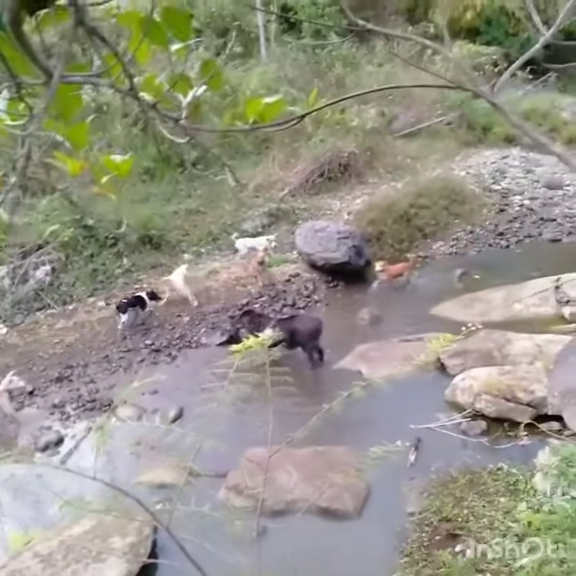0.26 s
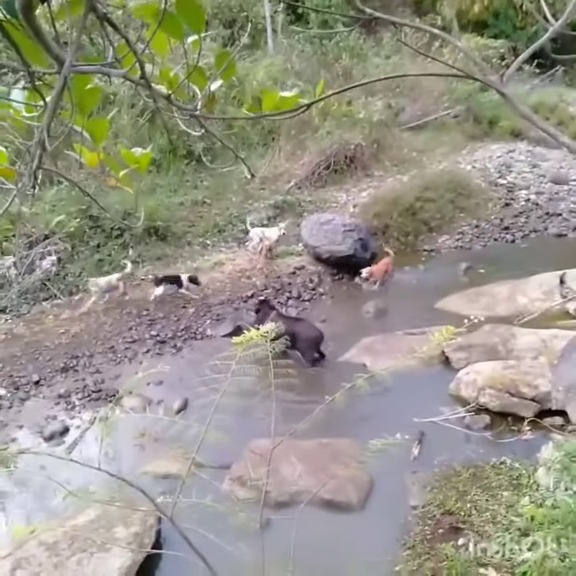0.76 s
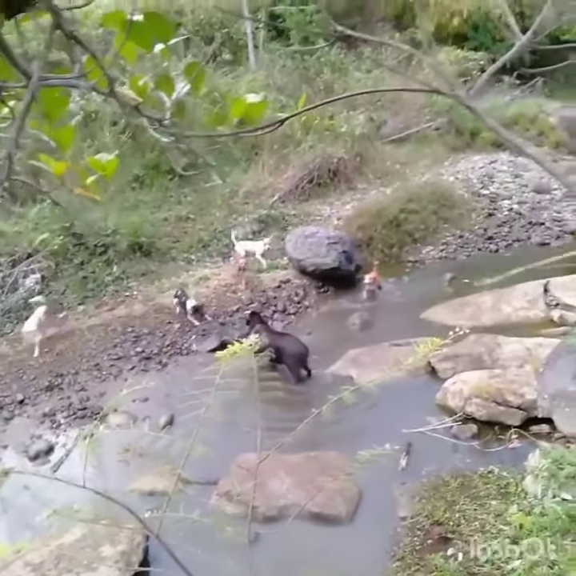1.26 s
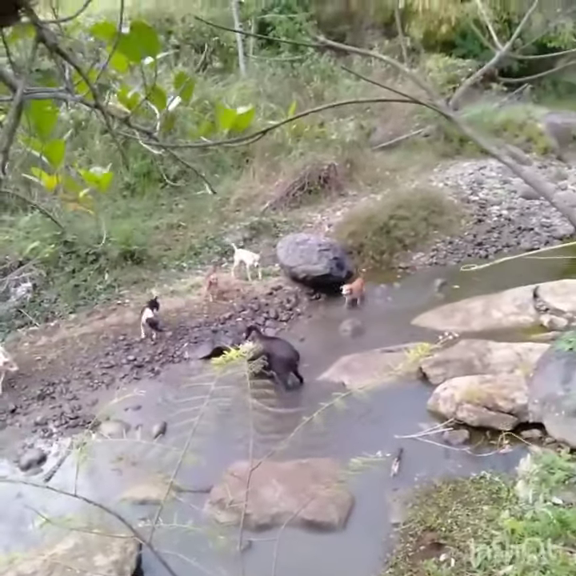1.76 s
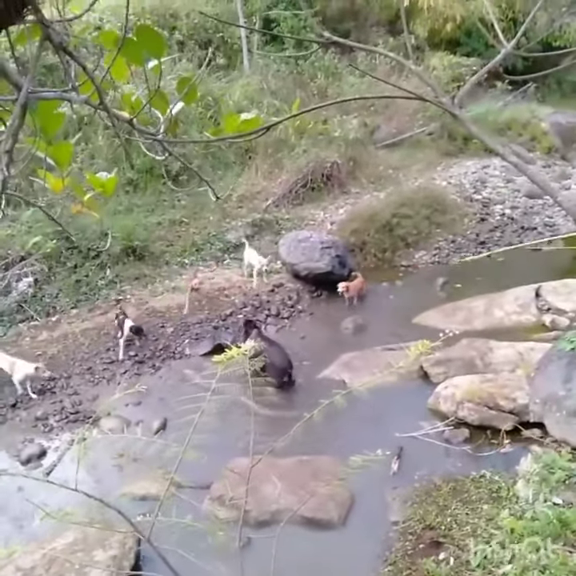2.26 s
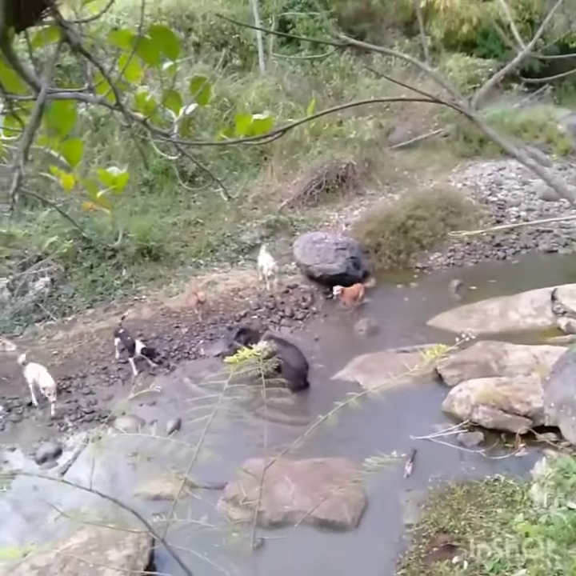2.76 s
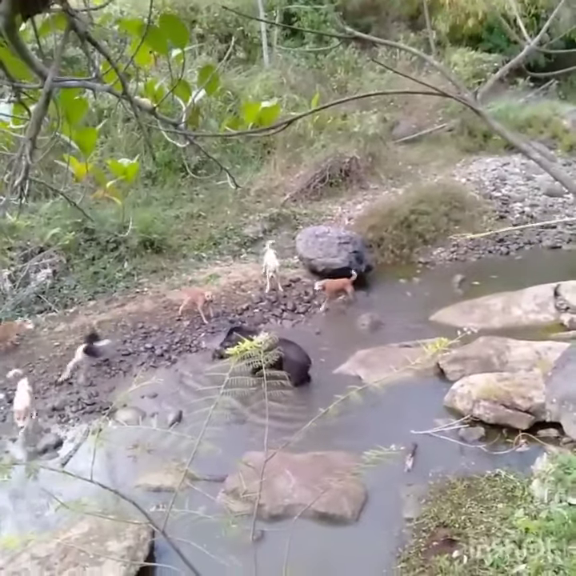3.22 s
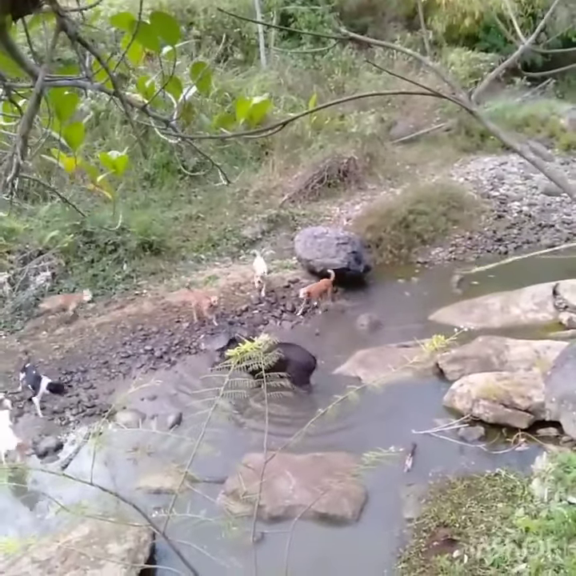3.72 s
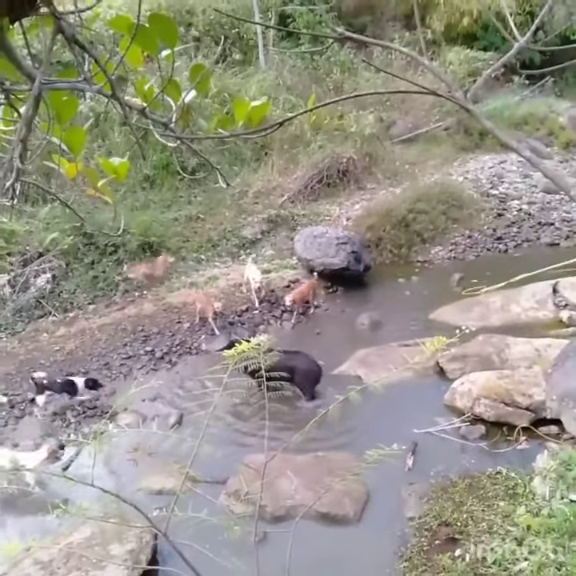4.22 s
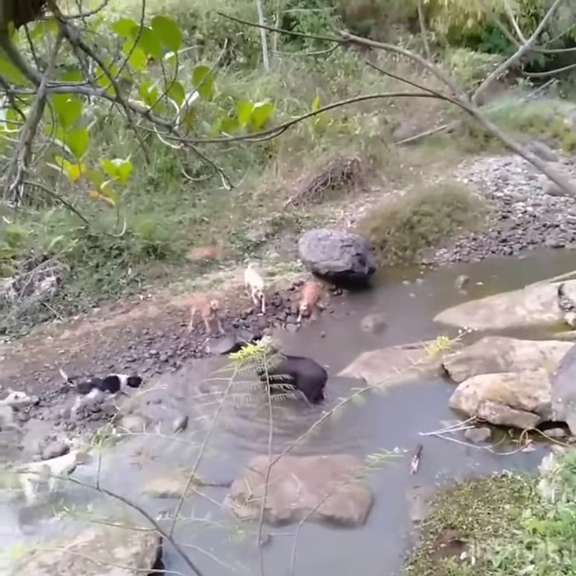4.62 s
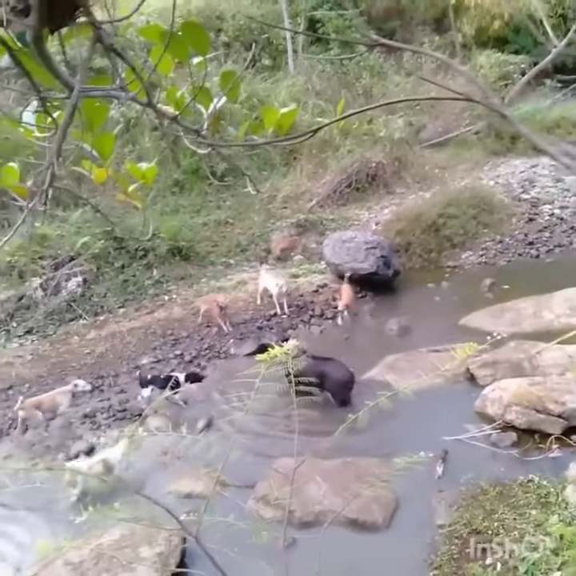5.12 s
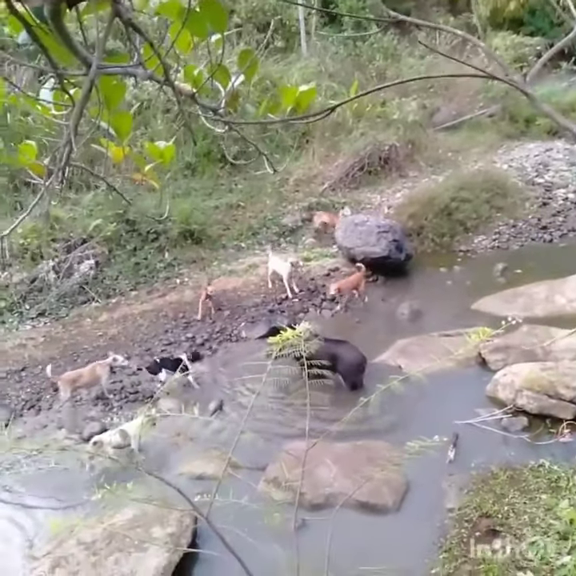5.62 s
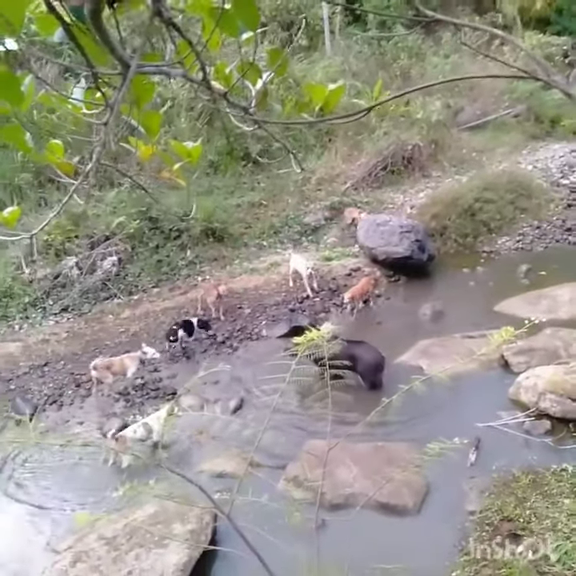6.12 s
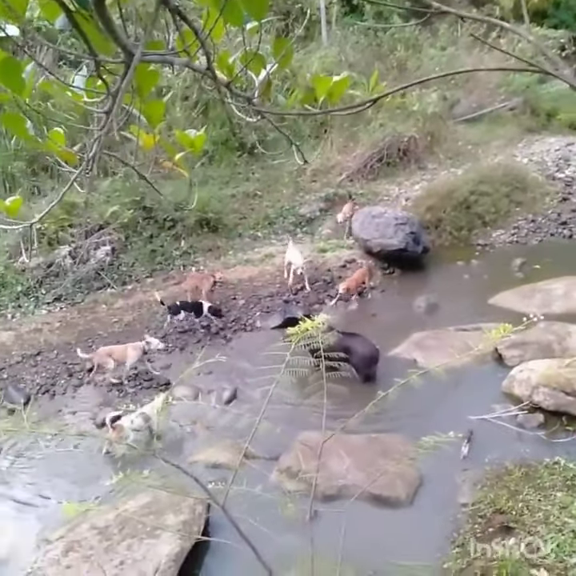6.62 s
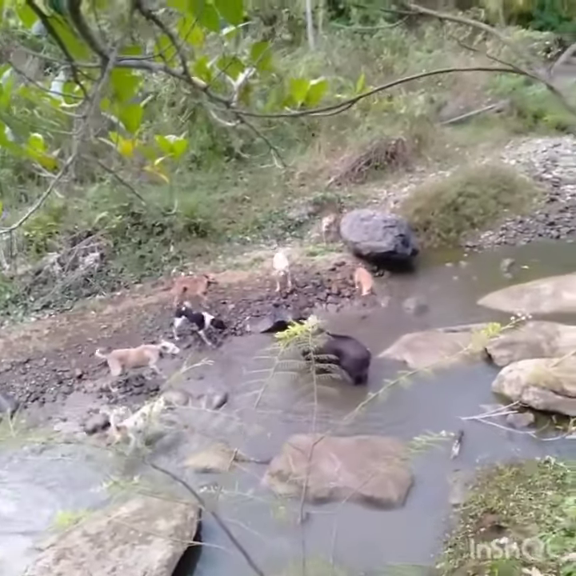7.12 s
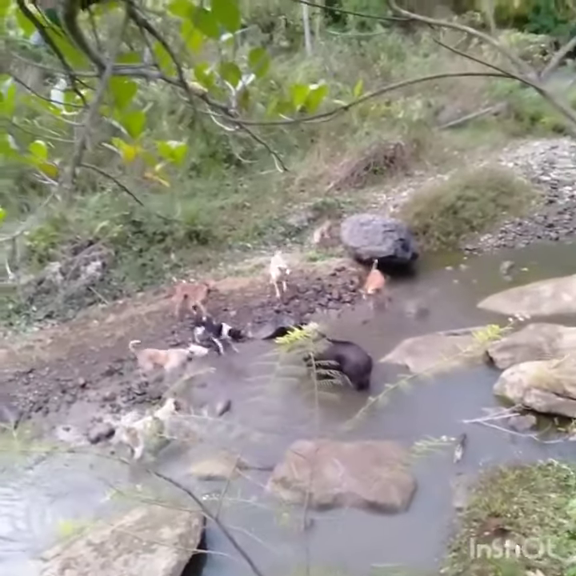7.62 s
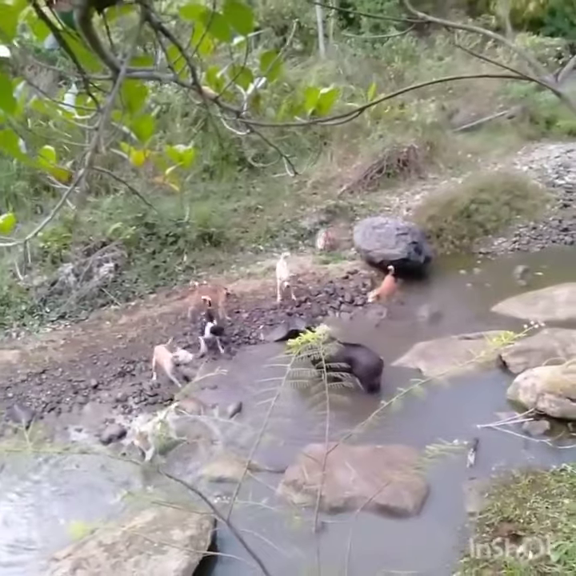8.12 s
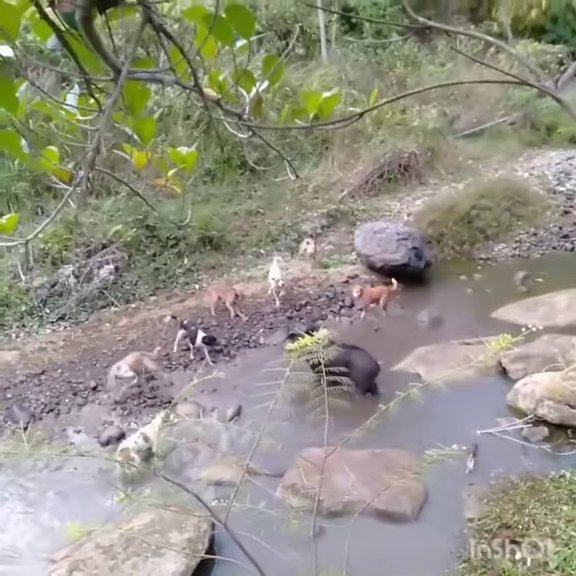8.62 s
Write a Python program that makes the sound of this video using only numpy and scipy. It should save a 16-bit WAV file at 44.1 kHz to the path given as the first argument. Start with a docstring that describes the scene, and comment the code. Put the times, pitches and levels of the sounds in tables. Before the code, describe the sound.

Hoarse, high barks from several excited dogs overlap rapidly and echo off rocks and slopes, over very faint water and a few crackling snaps.

```python
"""A pack of hunting dogs holds an animal at bay in a shallow stream, heard from the bank above.
It opens in a wind gust of lumpy low noise; dull noise bumps and dry snaps of dying noise soon join it.
All the while hoarse barks and yelps overlap: harmonics arching in pitch through mouth resonances,
scattered by rocks and slopes. Under them lie a noise wash and a low gurgle, the faint stream.
After the last bark a few snaps and short gusts close the scene."""
import sys
import numpy as np
from scipy import signal
from scipy.fft import rfft, irfft, next_fast_len
from scipy.io import wavfile
from scipy.ndimage import uniform_filter1d, minimum_filter1d

SR = 44100
rng = np.random.default_rng(int(sys.argv[2]) if len(sys.argv) > 2 else 0)


def wav_record(signal):
    """Record a signal, one row per channel, as 16-bit PCM in the file named by sys.argv[1]."""
    frames = np.transpose(np.atleast_2d(signal))
    bounded = np.clip(frames, -1, 1)
    # unit amplitude maps onto the largest positive 16-bit level
    quanta = np.round(bounded * 32767).astype(np.int16)
    wavfile.write(sys.argv[1], SR, quanta)


N = 391166
TIME = np.arange(N) / SR


def pack(sizzle_db=-38):
    """All the dogs: the throat tone carries each bark, the bright ring comes as the jaws open."""
    # one bark per row: start t/s, length/s, throat level/dB, throat crest/share of length,
    # open-mouth ring level/dB, ring crest/share, pitch crest/share, start, top and end pitch f/Hz,
    # roughness/0-1, nominal jaw resonance f/Hz, mouth resonance f/Hz and relative level/dB,
    # upper resonance f/Hz and relative level/dB
    bark_rows = [(0.0, 0.12, -32.5, 0.056, -43.5, 0.44, 0.2, 360, 380, 359, 0.014, 1170, 1490, -24, 2310.0, -28),
                 (0.083, 0.14, -17.5, 0.41, -22.5, 0.53, 0.29, 503, 673.6, 538, 0.71, 1255, 1810, -5.5, 2450, -6),
                 (0.346, 0.13, -38, 0.5, -33, 0.47, 0.43, 933, 1033, 964, 0.64, 950, 1540, -2, 2500, -16),
                 (0.716, 0.128, -41, 0.85, -43, 1, 0.54, 553, 549, 520, 0.23, 1113, 1685, -9, 2520, -12.5),
                 (0.811, 0.17, -18.5, 0.66, -20, 0.3, 0.45, 358.3, 719, 640, 0.46, 998, 1756, 7, 2430, 1.5),
                 (1.298, 0.2, -16.5, 0.9, -20, 0.35, 0.5, 334.7, 711.7, 553, 0.66, 1586, 1980.0, -9.5, 2530, 1),
                 (1.38, 0.111, -27.5, 0.51, -21, 0.58, 0.76, 559, 628, 550, 0.35, 1260.0, 1664, -3, 2370, 1.5),
                 (1.451, 0.101, -30.5, 1, -20.5, 0.3, 0.32, 813, 934, 546, 0.21, 1024, 1790, 3, 2330, -3.5),
                 (1.574, 0.14, -25.0, 0.66, -27.5, 0.57, 0.53, 443.7, 764.0, 478, 0.33, 1210, 1840, -8, 2360, -8),
                 (1.732, 0.11, -34.5, 0.59, -17.5, 0.68, 0.6, 394.4, 849, 706, 0.46, 1570, 2300, -19.5, 2700.0, 1),
                 (1.92, 0.14, -23.5, 0.55, -21.5, 0.34, 0.83, 534.3, 615.0, 581.0, 0.68, 1173, 1930, 13, 2800, 0),
                 (1.937, 0.12, -20.5, 0.32, -15.5, 0.42, 0.28, 564, 750, 540, 0.61, 1190, 2000, 4, 2610, -11),
                 (2.102, 0.14, -18.5, 0.32, -22.0, 0.51, 0.34, 620.6, 715.6, 535.0, 0.42, 1185, 1820, -3.5, 2345, -2.5),
                 (2.33, 0.18, -29.0, 0.65, -23.5, 0.66, 0.6, 410.2, 582.4, 514, 0.6, 1180, 2100, 1, 2400, -9.5),
                 (2.473, 0.14, -30, 0.53, -18, 0.37, 0.76, 388.4, 739.0, 619, 0.42, 1540, 2150, -21.5, 2396, 2),
                 (2.616, 0.14, -16.5, 0.49, -26.5, 0.5, 0.55, 550, 739, 650, 0.3, 1347, 1830, 4.5, 2380, 0),
                 (2.775, 0.121, -22.5, 0.96, -20, 0.51, 0.56, 391, 696, 685, 0.37, 1344, 2035, -4, 2340.0, -0.5),
                 (2.922, 0.18, -23.5, 0.51, -20, 0.48, 0.67, 424, 619, 566, 0.51, 1066, 1925, -2.5, 2690, -2.5),
                 (3.113, 0.12, -42, 0.37, -33, 0.19, 0.32, 978, 1006, 919.0, 0.35, 1010, 1960.0, -10, 2680.0, -30),
                 (3.186, 0.12, -27.5, 0.81, -25.5, 0.26, 0.51, 415, 653, 570, 0.55, 1220, 1890, 3, 2640, 0.5),
                 (3.28, 0.159, -21.5, 0.59, -17.5, 0.4, 0.75, 654, 758, 695, 0.46, 1300, 1740, 0, 2450, 2),
                 (3.463, 0.15, -33, 0.44, -30, 0.42, 0.46, 461.5, 610, 535, 0.54, 1023, 1820, -5.5, 2530, -0.5),
                 (3.597, 0.13, -17.5, 0.58, -23.0, 0.32, 0.28, 586, 769.6, 747, 0.44, 1400, 1925, -3.5, 2550, -3),
                 (3.649, 0.122, -27, 0.7, -26, 0.32, 0.84, 565, 589, 543, 0.61, 980, 1744, -6, 2590, -17),
                 (3.855, 0.14, -32.0, 0.28, -30.5, 0.36, 0.23, 637, 721.5, 570, 0.9, 1630, 1890.0, -5.5, 2400, -5.5),
                 (3.914, 0.14, -25, 0.4, -21.5, 0.3, 0.55, 403.6, 660.6, 637, 0.46, 1636, 1930.0, -8.5, 2850, 2.5),
                 (4.081, 0.15, -21.5, 0.9, -20, 0.27, 0.25, 636.5, 872, 524, 0.36, 915, 1506, -1.5, 2385, -3),
                 (4.195, 0.1, -31, 0.76, -27, 0.43, 0.57, 639.0, 642.4, 662, 0.35, 1190, 1930, 0.5, 2780, 1),
                 (4.265, 0.2, -23.5, 0.65, -19, 0.64, 0.55, 606, 609, 617, 0.77, 1123, 1750.0, 2.5, 2480, 0.5),
                 (4.396, 0.14, -19, 0.25, -22.0, 0.36, 0.31, 554, 719.3, 632, 0.92, 1220, 1710.0, -6, 2590, -20.5),
                 (4.549, 0.068, -44.0, 0.61, -36.5, 0.8, 0.62, 772, 1001, 955, 0.68, 985, 1520, 3, 2700.0, -18.0),
                 (4.597, 0.23, -32, 0.24, -28, 0.18, 0.2, 663.6, 647.4, 535, 0.74, 1514, 1970, -11, 2620.0, -8.5),
                 (4.717, 0.13, -16.5, 0.37, -22, 0.23, 0.7, 602.5, 669.7, 580, 0.53, 1610, 1836, 3.0, 2690, 4.5),
                 (4.88, 0.19, -24, 0.41, -21.5, 0.35, 0.58, 482, 635.6, 567, 0.68, 1138, 1646, -0.5, 2310, 3),
                 (5.059, 0.11, -35.5, 0.15, -34, 0.32, 0.38, 889.0, 1020, 1046, 0.42, 1060, 1650, -6, 2300, -11),
                 (5.194, 0.14, -21.5, 0.83, -20, 0.44, 0.5, 398.3, 804, 717, 0.42, 1474, 1855, -3, 2780, -6.5),
                 (5.316, 0.13, -33.5, 0.49, -22.0, 0.26, 0.64, 398.8, 709, 501, 0.44, 1230, 2330, 0.5, 2470.0, -7.5),
                 (5.527, 0.13, -43, 0.55, -39.5, 0.74, 0.87, 460.0, 577, 554.0, 0.91, 1120, 1720, -11, 2440, -8.5),
                 (5.614, 0.18, -27.0, 0.34, -20.0, 0.47, 0.75, 325.8, 739.5, 675, 0.45, 1590.0, 2300, 1, 2620, -16),
                 (5.718, 0.13, -19.0, 0.12, -22.5, 0.35, 0.23, 656, 735.5, 642, 0.53, 1335, 1770, -5.5, 2340, -21.5),
                 (5.835, 0.14, -22.5, 0.27, -23.5, 0.3, 0.58, 501, 597, 626, 0.54, 1136, 1530.0, -7.5, 2305, -8.5),
                 (5.983, 0.193, -22.5, 0.4, -24.0, 0.38, 0.26, 486.6, 734, 592, 0.47, 1626, 2000, -0.5, 2460, -5),
                 (6.115, 0.14, -24.5, 0.49, -23.5, 0.078, 0.64, 381, 593, 618, 0.47, 1170, 1560, -13.5, 2430, -4),
                 (6.248, 0.099, -19, 0.57, -20, 0.47, 0.35, 565, 840.4, 558, 0.58, 970.0, 1876, 4.0, 2506, 9.0),
                 (6.28, 0.12, -22, 0.56, -25.5, 0.26, 0.49, 612, 668, 606, 0.48, 1220, 1830, 3, 2490, 2),
                 (6.5, 0.14, -20.5, 0.38, -21.5, 0.61, 0.14, 682.6, 689.3, 514, 0.49, 1274, 1950, 1, 2610, -1),
                 (6.569, 0.13, -24, 0.77, -22, 0.69, 0.44, 479, 586, 586, 0.68, 1103, 1860, -8.5, 2550, 2.5),
                 (6.641, 0.121, -25.5, 0.83, -23.5, 0.48, 0.59, 538, 609.5, 578, 0.72, 1086, 1686, -0.5, 2600, -27),
                 (6.889, 0.054, -26.5, 0.52, -25.0, 0.98, 0.5, 599, 775, 632.0, 0.46, 1316, 2260.0, -1, 2490, -8),
                 (6.931, 0.12, -18, 0.5, -21.5, 0.17, 0.64, 603, 716, 673, 0.52, 1385, 2080, 0.5, 2640, 3.0),
                 (6.984, 0.13, -26.0, 0.71, -25.0, 0.61, 0.87, 592, 659, 673, 0.48, 1430, 1950, -2.5, 2250, 8.5),
                 (7.107, 0.16, -22.5, 0.52, -27.0, 0.31, 0.61, 397.5, 615.7, 557, 0.41, 1185, 1990, -4.5, 2620, -3.5),
                 (7.298, 0.13, -20, 0.37, -23.0, 0.68, 0.47, 646.6, 677, 564.0, 0.38, 1600, 2035, -0.5, 2370, -0.5),
                 (7.39, 0.09, -33.5, 1, -20.5, 0.26, 0.2, 1047, 1266, 636, 0.35, 1320, 2250, 3.5, 2460, -3),
                 (7.488, 0.12, -19.5, 0.78, -21, 0.43, 0.65, 431, 699.5, 663, 0.43, 1380, 2020, 3.5, 2430, 0.5),
                 (7.633, 0.18, -22.5, 0.41, -20.0, 0.4, 0.6, 688.4, 763, 681, 0.46, 1360, 1784, 0, 2440, -4),
                 (7.711, 0.152, -28.0, 0.4, -28.5, 0.81, 0.42, 633, 625.0, 620, 0.83, 1244, 1810, 5.5, 2610, 5),
                 (7.817, 0.16, -31, 0.092, -24.0, 0.41, 0.32, 613, 639, 629, 0.9, 1260, 2030, 0, 2470, 0),
                 (7.89, 0.075, -34.5, 1, -35, 0.3, 0.33, 1004, 1152, 586, 0.22, 1170, 1920, -4.5, 2330, -6),
                 (7.958, 0.14, -26.0, 0.82, -21.0, 0.36, 0.62, 330.8, 673.5, 633, 0.41, 1214, 1575, 6, 2490, 12),
                 (8.11, 0.14, -28.5, 0.32, -25.0, 0.56, 0.54, 528, 646, 658, 0.97, 1334, 1860, -6.5, 2570, -3.5),
                 (8.192, 0.23, -26.5, 0.38, -25.5, 0.4, 0.56, 581.6, 570, 518, 1, 1085, 1670, -6.0, 2600, -4),
                 (8.356, 0.12, -23, 0.87, -20, 0.31, 0.66, 506, 608, 564, 0.35, 1173, 1604, 6.5, 2630.0, 11)]
    # outline of the ring after its way through the air: f/Hz, relative level/dB per Hz
    ring_colour = [(560, -19), (950, -2.5), (1160, -3.5), (1330, -5.5), (1810, -4.5), (2200, -7),
                   (2530, -7.5), (2920, -7.5), (3320, -18.5), (3950, -26), (5110, -27), (6840, -12),
                   (10100, -33.5), (12100, -59.5), (15500, -42.5)]
    dogs = np.zeros(N + SR)
    for start, length, throat_db, throat_crest, ring_db, ring_crest, *voice in bark_rows:
        sound = rocks(bark(length, *voice))
        size, at = len(sound), int(start * SR)
        low_band = cut(cut(sound, 525.0, "high", order=8), 823, "low", order=6)
        throat = evened(low_band)
        ring = evened(coloured(cut(sound, 820, "high", order=6), ring_colour))
        # a faint sizzle rides on top of the bright ring
        hiss = cut(rng.standard_normal(size), [13500, 16000], "band")
        sizzle = from_db(sizzle_db) * rms_one(hiss)
        dogs[at:at + size] += from_db(throat_db) * swell(size, length, throat_crest) * throat
        dogs[at:at + size] += from_db(ring_db) * swell(size, length, ring_crest) * (ring + sizzle)
    return dogs[:N] + slopes(dogs[:N])


def bark(length, crest, start_hz, top_hz, end_hz, rough, jaw_hz, mouth_hz, mouth_db, upper_hz, upper_db,
         body_db=-19, width_hz=230, fade_s=0.016, mouth_lift_db=2.0, upper_lift_db=3.5,
         gape_start=0.93, gape_widest=1.058, gape_end=0.88, flare_db=4.5, edge_db=-9, edge_width_hz=150):
    """One bark: the pitch swings from start to top to end while the jaws open and close."""
    t = np.arange(int(length * SR)) / SR
    rise = length * np.clip(crest, .1, .9)
    # 0 at the pitch crest, 1 at either end
    slack = np.abs(np.interp(t, [0, rise, length], [-1, 0, 1])) ** 1.7
    outer_hz = np.where(t < rise, start_hz, end_hz)
    pitch = top_hz + (outer_hz - top_hz) * slack
    source = vocal_folds(pitch, rough * (.95 - .65 * slack))   # hoarsest at the crest
    throat = cut(resonance(source, np.maximum(pitch, 630.), 234.0), [400, 1000], "band", order=1)
    # three resonances of the mouth are highest at the widest gape and sink as the jaws close
    gape = np.interp(t, [0, 0.71 * rise, length], [gape_start, gape_widest, gape_end])
    mouth = from_db(body_db) * cut(source, 970, "high")
    resonances = (jaw_hz, 0), (mouth_hz, mouth_db + mouth_lift_db), (upper_hz, upper_db + upper_lift_db)
    for hz, db in resonances:
        flare = from_db(flare_db * wander(45.9, len(t)))
        mouth = mouth + from_db(db) * flare * resonance(source, hz * gape, width_hz)
    # weak higher resonances, different in every bark, give it an edge
    for hz in rng.uniform([3300, 4600, 6300], [4500, 6200, 7500]):
        mouth = mouth + from_db(edge_db) * resonance(source, hz * gape, edge_width_hz)
    fade = np.clip(np.minimum(t, t[-1] - t) / fade_s, 0, 1)
    return rms_one(throat + 0.78 * mouth) * np.sin(fade * np.pi / 2) ** 2


def vocal_folds(pitch, hoarse, slope_db=-3.0, half_tones=1.0, jitter=0.0451, flutter=0.89, rasp=4.5):
    """A stack of harmonics; strain makes the cycles uneven in length and strength, and adds a pulsing rasp."""
    size = len(pitch)
    unsteady = wander(459.2, size) + 0.617 * wander(113.8, size)
    phase = 2 * np.pi * np.cumsum(pitch * (1 + jitter * hoarse * unsteady)) / SR
    multiples = np.arange(1, 15)[:, None]
    gains = from_db(slope_db * np.log2(multiples))   # the slope is in dB per octave
    folds = np.sum(gains * np.cos(multiples * phase), axis=0)
    # strong and weak cycles alternate loosely, filling in between the harmonics
    alternation = half_tones * np.cos(phase / 2 + 1.17 * wander(128.7, size))
    uneven = alternation + flutter * wander(519.7, size)
    breath = cut(rng.standard_normal(size), [1000, 4500], "band", order=1)
    air = breath * (1 + .7 * np.cos(phase))   # pulses once a cycle
    return folds * (1 + 2 * hoarse * uneven) + rasp * (hoarse + .08) * air


def resonance(x, hz, width_hz):
    """A two-pole resonance whose centre may move: a decaying memory that turns at the centre frequency."""
    r = np.exp(-np.pi * width_hz / SR)
    turn = np.exp(2j * np.pi * np.cumsum(hz) / SR)
    return 2 * np.real(turn * signal.lfilter([1 - r], [1, -r], x / turn))


def swell(size, length, crest, waver_db=1.5, waver_per_s=40, onset_s=0.012,
          swell_db=27, sink_db=16.5, arch_power=2.004, release_db_per_s=395.5):
    """Loudness of a bark: a quick onset, a wavering arch over the crest, a release."""
    t = np.arange(size) / SR
    top = length * np.clip(crest, .1, .9)
    away = np.abs(np.interp(t, [0, top, length], [-1, 0, 1])) ** arch_power
    arch_db = np.where(t < top, swell_db, sink_db) * away
    drop_db = arch_db + release_db_per_s * np.maximum(t - length, 0)
    return from_db(waver_db * wander(waver_per_s, size) - drop_db) * np.minimum(t / onset_s, 1)


def evened(x, window_s=0.032):
    """Hold a voice near unit level while it sounds; its faint ends still die away."""
    size = int(window_s * SR)
    level = rms_one(x)
    power = uniform_filter1d(uniform_filter1d(level ** 2, size), size)
    return level / np.sqrt(np.abs(power) + from_db(-26) ** 2)


def rocks(x, echo_db=-5, spread_s=.05, count=12):
    """Direct sound with a cluster of early echoes from rocks and water, drawn anew for each bark."""
    response = np.zeros(SR // 8)
    delay, strength = rng.random(count), rng.choice([-1, 1], count)
    at = ((.002 + spread_s * delay) * SR).astype(int)
    response[at] = strength * np.exp(-2 * delay)
    response *= from_db(echo_db) / np.linalg.norm(response)
    response[0] = 1
    return signal.fftconvolve(x, response)


def slopes(x, tail_db=-23.5, t60=0.68, thin_hz=850, build_s=.064):
    """A soft, dull tail of decaying noise, scattered back by the overgrown slopes."""
    t = TIME[:SR]
    scatter = cut(rng.standard_normal(SR), [thin_hz, 4000], "band", order=1)
    response = scatter * from_db(-60 * t / t60) * np.minimum(t / build_s, 1)
    return from_db(tail_db) * np.std(x) * rms_one(signal.fftconvolve(x, response)[:N])


def snaps(crack_t60=0.034, tail_db=-21, tail_t60=0.46, attack_s=0.0033, trim_db=-2.5):
    """Dry cracks near the microphone, like twigs: noise that dies at once, a small thud, a rustling tail."""
    # one snap per row: t/s, level before trim/dB, low thud level against the crack/dB
    snap_rows = [(0.3683, -17, -6.5), (0.7269, -22, -18), (0.796, -39.5, 14), (1.039, -45, -5.5),
                 (8.540, -25.5, -27), (8.766, -37, 1), (8.8478, -43, 14.5)]
    # outline of the crack: f/Hz, relative level/dB per Hz
    crack_colour = [(530, -15), (900, -16), (1470, -15), (1910, 3.5), (2310, -2.5), (2660, 1), (3140, -7.5),
                    (4390, -12), (7150, -4.5), (10200, -25), (15500, -12)]
    out, t = np.zeros(N + SR), TIME[:SR // 2]
    for s, snap_db, thud_db in snap_rows:
        decay = from_db(-60 * t / crack_t60) + from_db(tail_db - 60 * t / tail_t60)
        dying = decay * np.minimum(t / attack_s, 1)
        crack = rms_one(coloured(rng.standard_normal(len(t)), crack_colour)) * dying
        low_noise = cut(rng.standard_normal(len(t)), [350, 1200], "band")
        thud = rms_one(low_noise) * from_db(-60 * t / 0.046)
        at = int(s * SR)
        out[at:at + len(t)] += from_db(snap_db + trim_db) * (crack + from_db(thud_db) * thud)
    return out[:N]


def bumps(trim_db=-2.5, attack_s=0.01, t60=0.14, top_hz=190):
    """Short dull thumps on the microphone: low noise with a soft attack and a quick decay."""
    # one bump per row: t/s, level before trim/dB
    bump_rows = [(0.244, -34.5), (0.339, -35), (0.788, -33), (1.07, -37.5), (1.284, -34), (3.16, -34),
                 (3.52, -38)]
    out, t = np.zeros(N + SR), TIME[:SR // 4]
    for s, bump_db in bump_rows:
        thump = rms_one(cut(rng.standard_normal(len(t)), [45, top_hz], "band"))
        at = int(s * SR)
        out[at:at + len(t)] += from_db(bump_db + trim_db - 60 * t / t60) * np.minimum(t / attack_s, 1) * thump
    return out[:N]


def wind(lumpy_db=2.5, trim_db=-0.5):
    """Lumpy eddies on the microphone port: low noise that wavers fast and follows the gusts."""
    # strength of the gusts: t/s, level before trim/dB
    gust_curve = [(0.0, -35), (0.29, -52), (0.34, -39.5), (0.64, -57.5), (0.86, -44), (2.17, -64.5),
                  (2.54, -48.5), (3.09, -49), (3.16, -44.5), (4.25, -62), (5.21, -62), (5.36, -75),
                  (6.67, -59), (8.47, -77.5), (8.55, -46), (8.62, -76), (8.8, -72), (8.87, -48)]
    # outline of the eddies: f/Hz, relative level/dB per Hz
    eddy_colour = [(12, -29.5), (20, 2.5), (69, 2), (129, -4), (192, -13.5), (229, -8.5), (330, -31),
                   (430, -54.5), (730, -120)]
    eddies = coloured(rng.standard_normal(N), eddy_colour) * from_db(lumpy_db * wander(28, N))
    return from_db(in_time(gust_curve) + trim_db) * rms_one(eddies)


def stream(ripple_db=3.5, wash_db=-53):
    """A soft noise wash of shallow water over a low gurgle of four wavering narrow bands."""
    # outline of the wash: f/Hz, relative level/dB per Hz
    wash_colour = [(59, -49), (100, -29), (173, -20), (264, -10.5), (355, -23.5), (403, -10.5), (898, -7),
                   (977, -18.5), (1060, -10), (2930, -15.5), (3690, -22), (5400, -25.5), (7100, -19.5),
                   (8770, -32.5), (15500, -33.5)]
    # low gurgle of the water: t/s, level/dB
    gurgle_curve = [(0, -58.5), (.7, -77), (1.6, -59), (4.0, -60), (6.0, -62.5), (7.5, -60), (8.87, -56)]
    wash = rms_one(coloured(rng.standard_normal(N), wash_colour)) * from_db(ripple_db * wander(30, N))
    gurgle = np.zeros(N)
    for hz in (134.4, 185, 251.4, 296.6):
        band = cut(rng.standard_normal(N), [hz - 18, hz + 18], "band")
        gurgle += band * from_db(4.9 * wander(18, N))
    return from_db(wash_db) * wash + from_db(in_time(gurgle_curve)) * rms_one(gurgle)


def from_db(db):
    """Decibels to gain."""
    return 10 ** (np.asarray(db) / 20)


def rms_one(x):
    """Scale to unit power."""
    return x / np.sqrt(np.mean(x ** 2) + 1e-20)


def in_time(rows):
    """A level curve read at every sample."""
    s, db = np.transpose(rows)
    return np.interp(TIME, s, db)


def cut(x, hz, kind, order=2):
    """Butterworth filter."""
    return signal.sosfilt(signal.butter(order, hz, kind, fs=SR, output="sos"), x)


def coloured(x, spectrum):
    """Give a sound a smooth spectral outline, drawn over log frequency."""
    hz, db = np.transpose(spectrum)
    size = next_fast_len(len(x) + 2048)
    bins = np.maximum(np.fft.rfftfreq(size, 1 / SR), 1)
    gain = from_db(np.interp(np.log(bins), np.log(hz), db))
    return irfft(rfft(x, size) * gain, size)[:len(x)]


def wander(per_s, size):
    """Random motion about 0: straight lines between normal draws, so many draws a second."""
    at = np.arange(size) * per_s / SR
    return np.interp(at, np.arange(size), rng.standard_normal(size))


def limited(x, ceiling):
    """A fast limiter: the gain dips smoothly around peaks above the ceiling."""
    gain = np.minimum(1, ceiling / (np.abs(x) + 1e-9))
    return x * uniform_filter1d(minimum_filter1d(gain, size=400), size=400)


def scene():
    """Dogs, snaps, wind, bumps and water on one microphone."""
    return (pack() + snaps() + wind() + bumps() + stream())[None]


def record(dry, cutoff_hz=15800):
    """The loudest peaks are held down and the top is cut steeply."""
    held = limited(dry, .37)
    return signal.sosfilt(signal.ellip(10, .1, 80, cutoff_hz, fs=SR, output="sos"), held)


dry = scene()
out = record(dry)
wav_record(out)
```